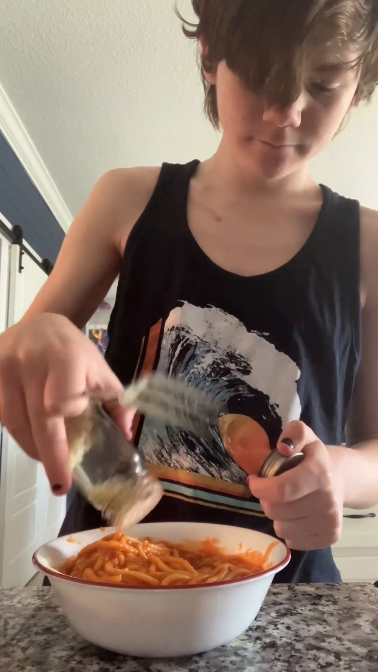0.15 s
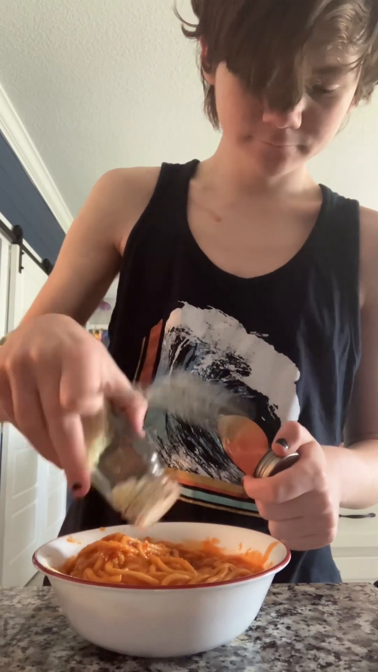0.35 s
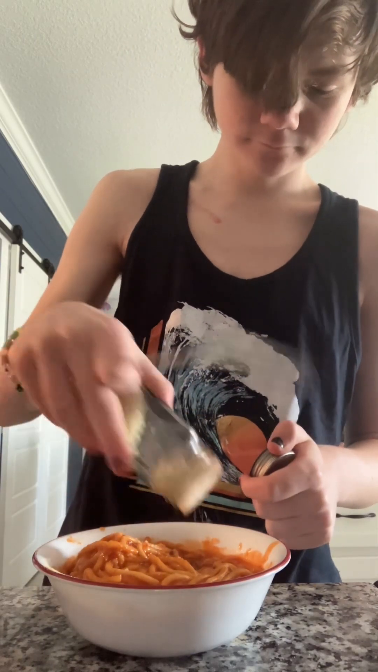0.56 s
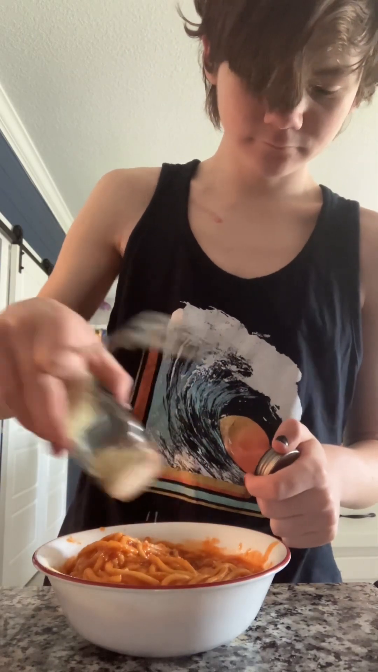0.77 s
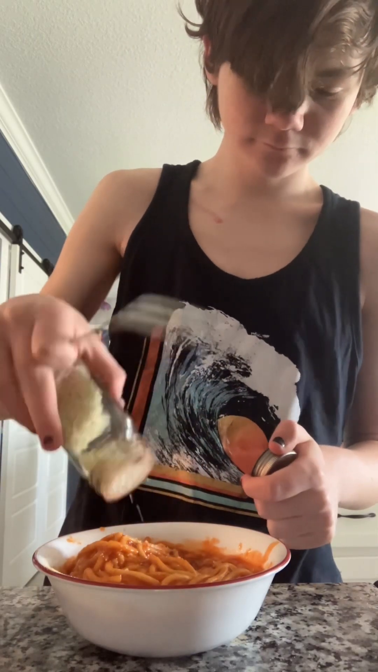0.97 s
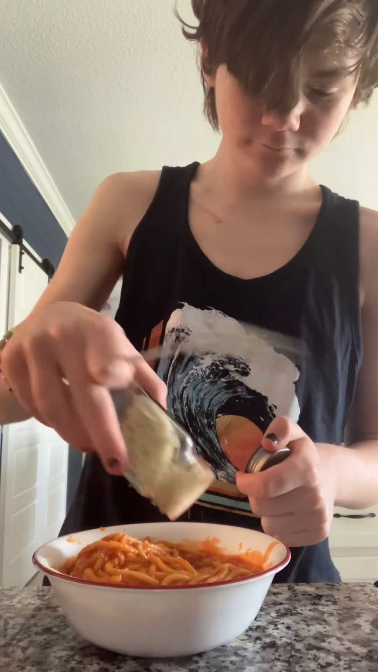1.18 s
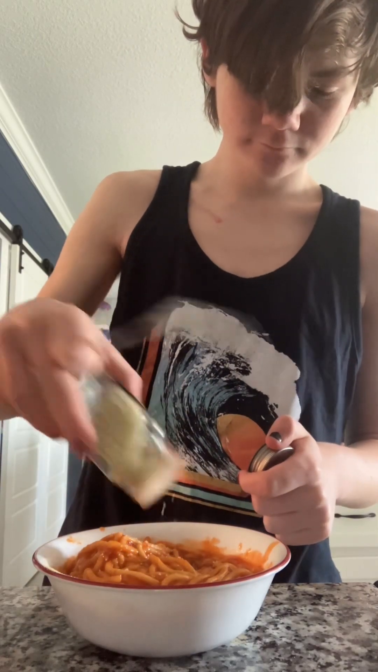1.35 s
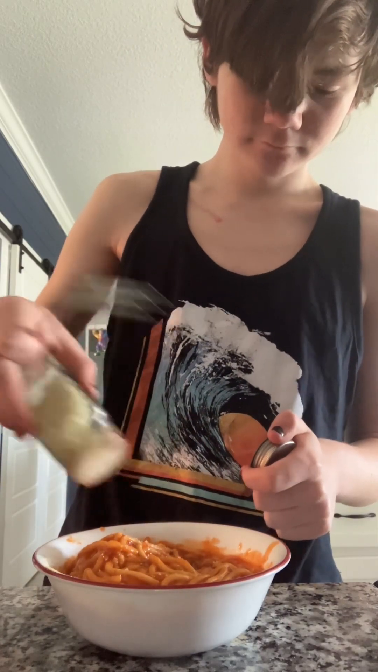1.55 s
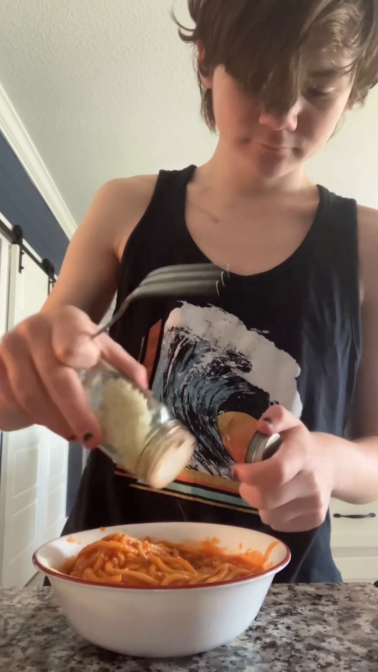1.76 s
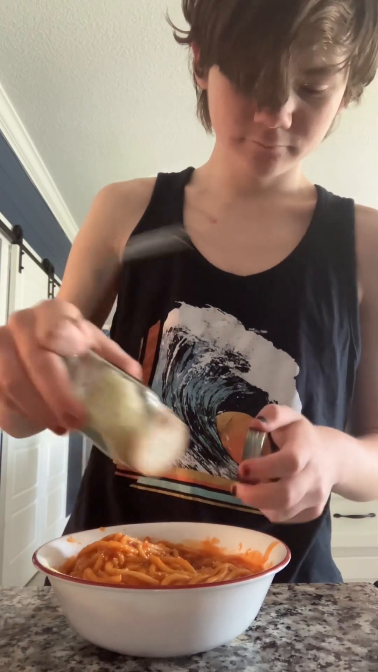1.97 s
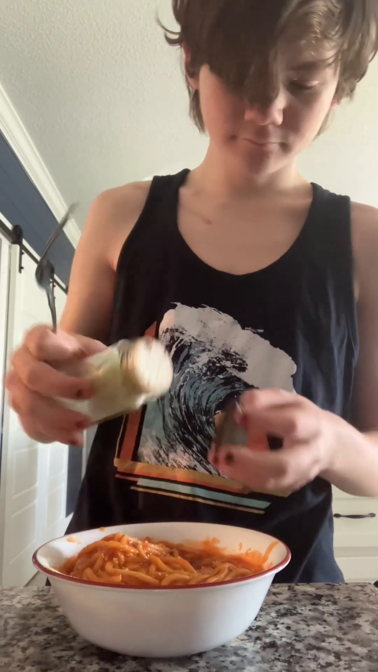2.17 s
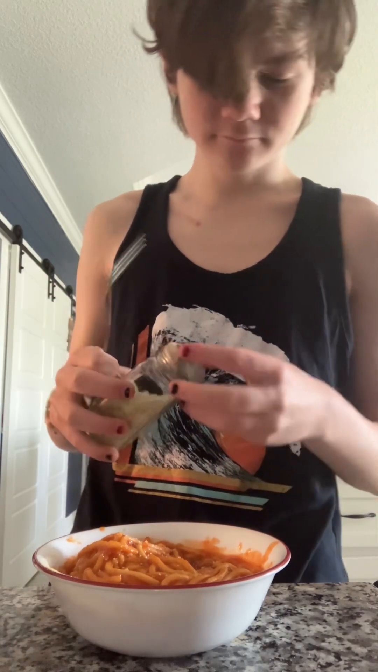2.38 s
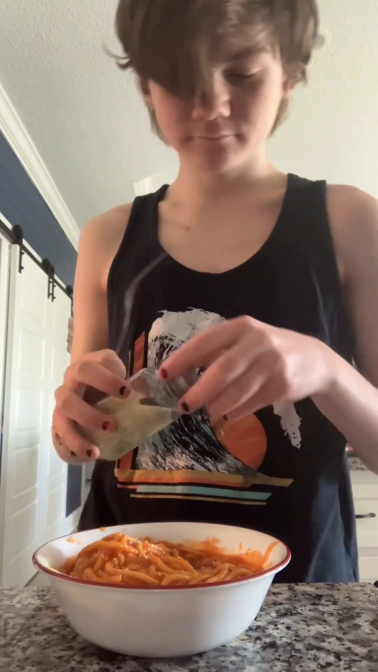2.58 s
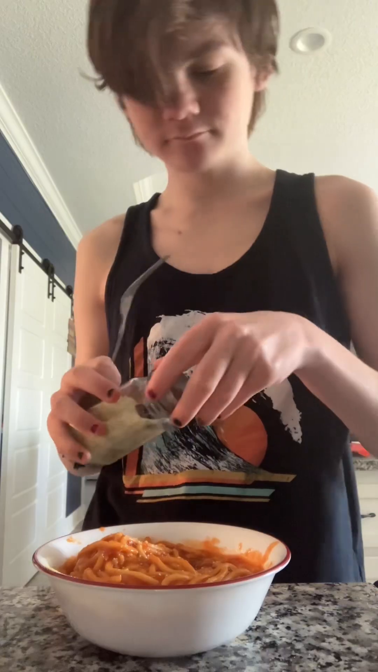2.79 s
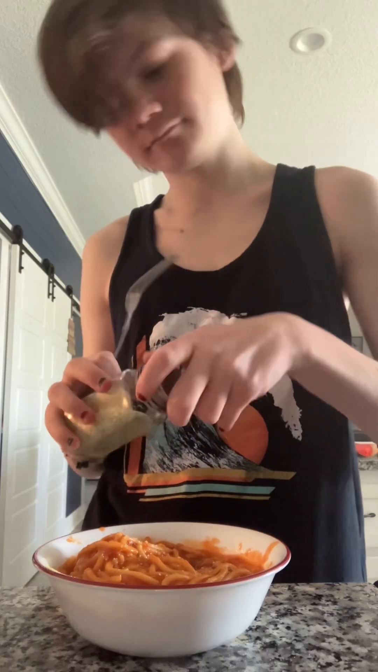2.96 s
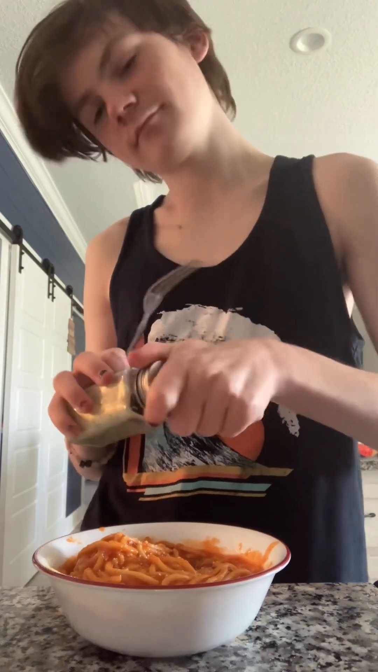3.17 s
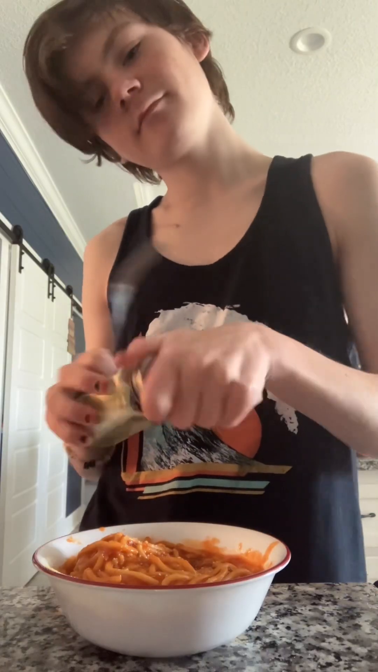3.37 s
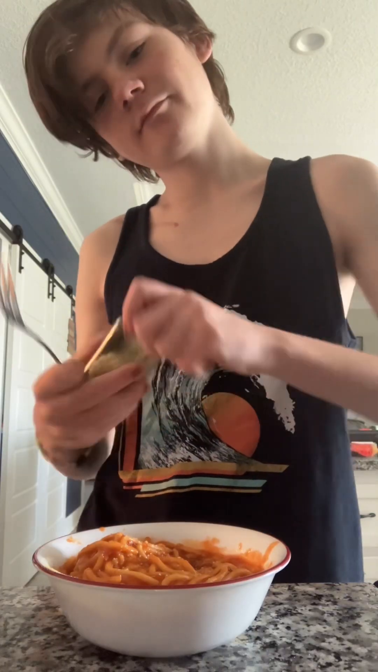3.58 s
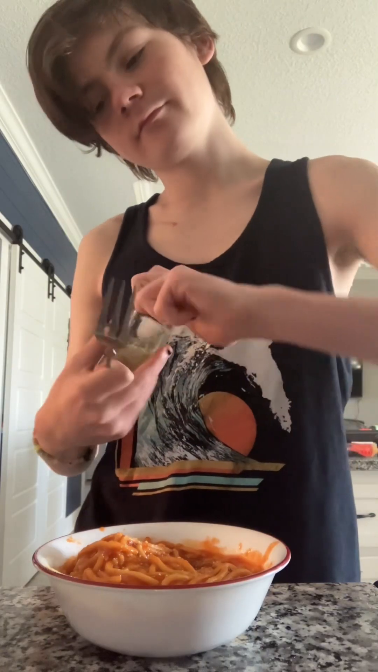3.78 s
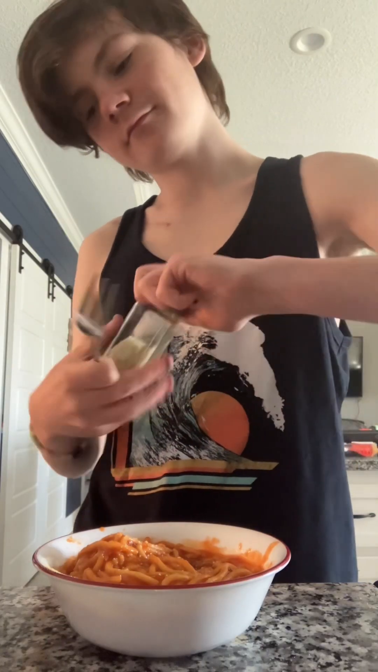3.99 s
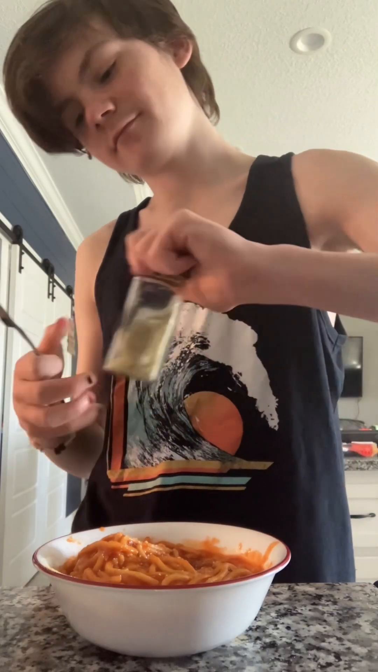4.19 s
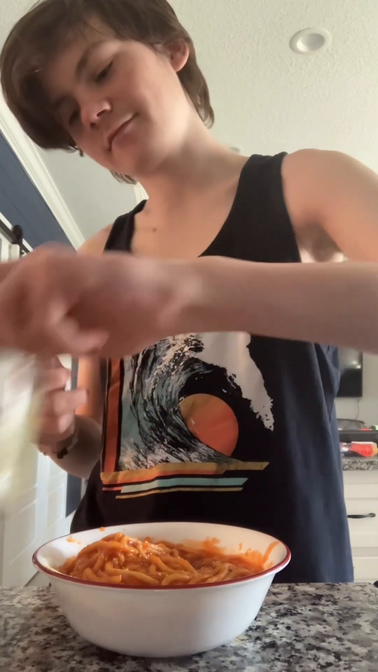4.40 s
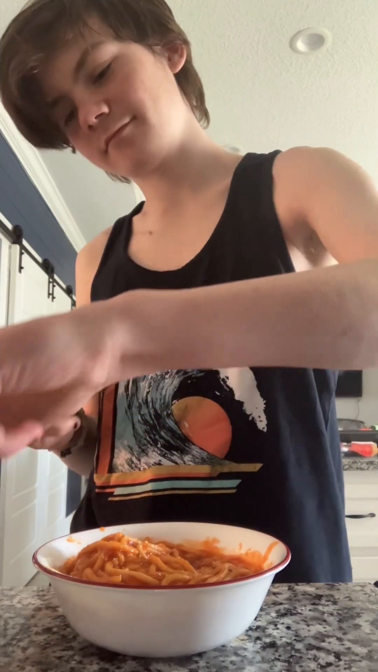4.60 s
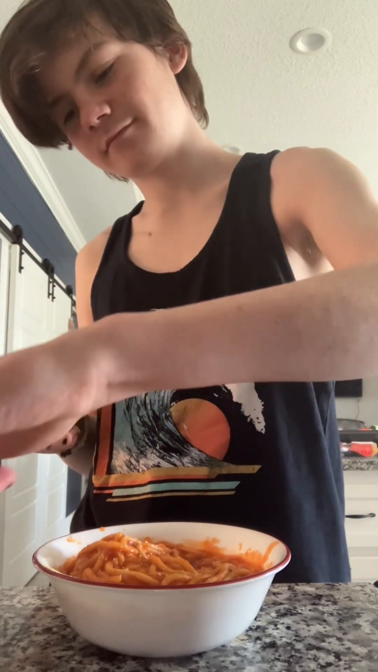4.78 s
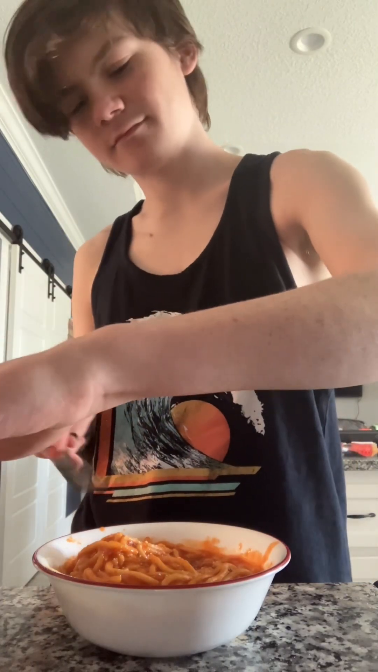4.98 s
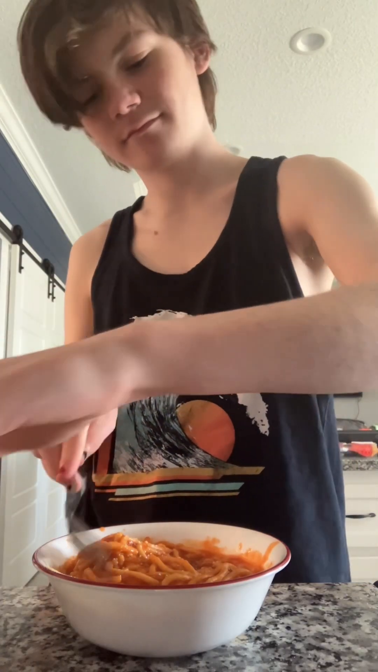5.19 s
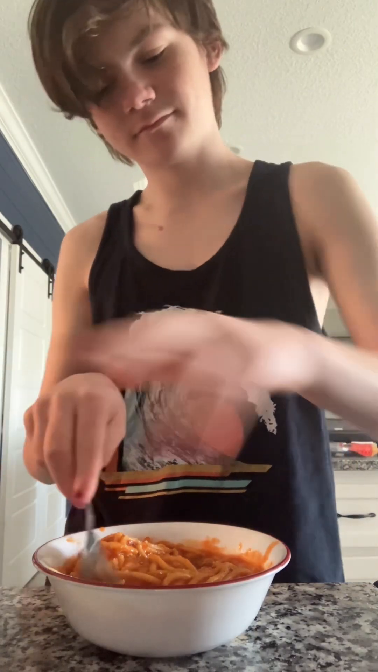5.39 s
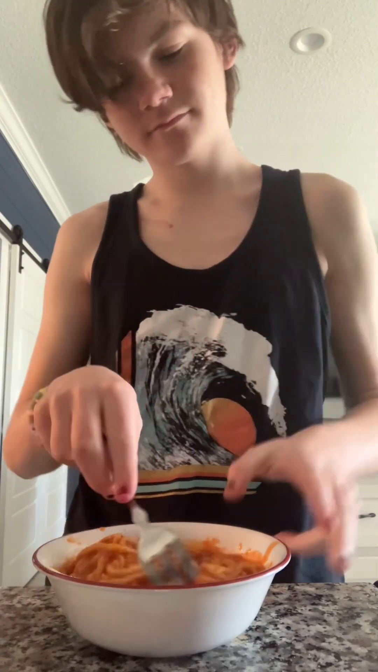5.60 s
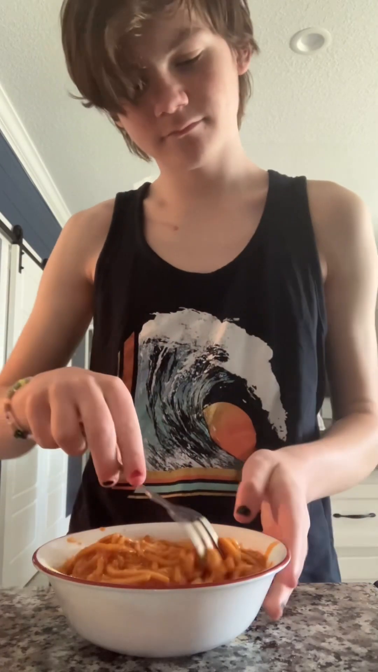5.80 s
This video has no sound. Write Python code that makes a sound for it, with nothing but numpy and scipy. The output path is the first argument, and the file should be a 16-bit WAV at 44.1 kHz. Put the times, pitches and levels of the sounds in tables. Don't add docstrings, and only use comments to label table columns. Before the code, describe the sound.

Close in a quiet kitchen, grains swish rapidly in a small glass jar for about two seconds while a fork clinks on it. A tin lid claps onto the rim, rubs, knocks and squeaks as it is screwed tight. After a pause the jar thuds onto a stone counter and rocks, then a fork lightly ticks the bowl. Faint fridge hum; stereo phone pickup.

```python
import sys
import numpy as np
from scipy import signal
from scipy.fft import rfft, irfft
from scipy.io import wavfile
from scipy.ndimage import uniform_filter1d

SR = 44100
rng = np.random.default_rng(int(sys.argv[2]) if len(sys.argv) > 2 else 0)


def pcm_store(signal):
    levels = np.round(np.clip(np.atleast_2d(signal), -1, 1) * 32767)
    wavfile.write(sys.argv[1], SR, levels.astype(np.int16).T)


def nominal_scale(level):
    x = np.asarray(level, float) / 20
    return 10 ** x


N = 257984
HZ = np.fft.rfftfreq(N, 1 / SR)

# (peak time [s], level [dB], share of the throw spent rising [0-1])
THROWS = [(0.0, -45.5, 0.32), (0.107, -49.5, 0.52), (0.186, -47.5, 0.53), (0.276, -47, 0.23),
          (0.362, -46.5, 0.37), (0.486, -49.5, 0.72), (0.556, -48.5, 0.56), (0.648, -48, 0.29),
          (0.721, -50, 0.38), (0.769, -55.5, 1), (0.844, -49.5, 0.19), (0.93, -46, 0.36),
          (1.042, -48, 0.61), (1.118, -48, 0.46), (1.249, -55.5, 0.45), (1.317, -53, 0.46),
          (1.428, -52.5, 0.26), (1.508, -50.5, 0.4), (1.627, -50, 0.5), (1.728, -47.5, 0.81),
          (1.835, -49.5, 0.83), (1.887, -48.5, 0.51)]
# (frequency [Hz], density [dB per Hz])
GRAIN_SPECTRUM = [(530, -77.5), (900, -29), (2110, -9), (2400, -18.5), (3080, -15.5), (3560, -11.5),
                  (4600, -1.5), (13900, 2.5), (15700, 2.5), (16200, -41)]
# (frequency [Hz], width [Hz], level [dB])
JAR_HISS = [(3740, 260, -9), (7894, 320, -10), (10380, 1200, -12)]


def grains():
    throw_s = 0.034
    s, db, share = np.transpose(THROWS)[:, :, None]
    rise, fall = throw_s * np.clip([share, 1 - share], .08, 1)
    grid = np.arange(0, 2.1, .001)
    late = grid - s
    decay = abs(late / np.where(late < 0, rise, fall)) ** 1.16
    power = (nominal_scale(db) ** 2 * np.exp(-decay)).sum(0)
    level = np.sqrt(np.interp(np.arange(N) / SR, grid, power, right=0))
    clumps = nominal_scale(1.1 * evened(uniform_filter1d(rng.standard_normal(N), 150)))
    impacts = colour(grit(9000, 3.5) * clumps, GRAIN_SPECTRUM, JAR_HISS)
    return nominal_scale(1.5) * level * patchy(impacts, 1.8)


# (time [s], peak # level [dB], frequency [Hz])
FLICKS = [(.0872, -46, 9000), (0.176, -47, 7800), (.183, -38.5, 7840), (0.269, -46, 8000),
          (.283, -40, 10000), (0.367, -41, 9500), (0.534, -43, 10000), (0.619, -45, 8500),
          (0.6464, -39, 10500), (1.2446, -44, 9000), (1.3104, -39, 10000), (1.4955, -41.5, 9000),
          (1.62, -44, 7450), (1.6945, -39, 10000), (1.8657, -44, 10000), (1.886, -34.5, 10000),
          (5.435, -38, 14300), (5.534, -53, 13800), (5.581, -47, 9400), (5.6889, -51, 14500),
          (5.7288, -49.5, 8440), (5.737, -55, 13300), (5.811, -56, 11400), (.0452, -37.5, 6200),
          (5.1127, -46, 1050), (4.838, -34, 1050)]


def flicks():
    out, t = np.zeros(N), np.arange(4000) / SR
    decay = nominal_scale(-60 * t / 0.016) + nominal_scale(-21.5 - 60 * t / 0.16)
    for (s, db, hz), noise in zip(FLICKS, rng.standard_normal((len(FLICKS), len(t)))):
        width = 0.23 * hz
        burst = resonate(resonate(noise * decay, hz, width), hz, width)
        add(out, s, nominal_scale(db) * burst / abs(burst).max())
    return out


# (time [s], peak level of the ring at 6-9 kHz [dB], body against the ring [dB],
# edge against the ring [dB], contact t60 [s])
FORK_ON_JAR = [
    (0.0455, -46, -3, -0.5, 0.0074),
    (0.053, -45.5, 8.5, 1, 0.026),
    (0.2339, -44, 3.5, -10, 0.0078),
    (0.4181, -37, 1.5, -1, 0.0352),
    (0.5866, -53, 8.5, 10, 0.023),
    (1.0191, -63, -2.5, 11.5, 0.0088),
    (1.5544, -27.5, -9, -12, 0.00963),
    (1.7635, -26, -9.5, -13, 0.0076),
    (1.9524, -17.5, -14, -7, 0.0071),
]
# (frequency [Hz], level [dB], t60 [s])
JAR = [(1500, -10, .02), (2300, -12, .012), (3880, 0, .015), (4450, -9, .012), (5000, -9, .012),
       (5450, -5, .022), (7220, 0, .016), (7760, -3, .02), (7650, -34, .15), (9200, -6, .01),
       (11630, -8, .012), (12560, -20, .02), (14200, -12, .015)]
# (frequency [Hz], level [dB], t60 [s])
JAR_NECK = [(1500, -15, 0.029), (2000, -15, 0.038), (3940, -9, 0.027), (4300, -9, 0.013), (5260, -26, .012),
            (5900, -15, .014), (7170, -5, 0.023), (7130, -15, .012), (6767, -24, .02), (9200, -30, .01),
            (10650, -20, .012), (12550, -20, .03), (14100, -24, .015)]


def fork_on_jar():
    taps = light(FORK_ON_JAR, -24.0)
    out = hits(taps[:6], JAR, -12, 830)
    out += hits(taps[6:7], JAR_NECK, -18, 780)
    return out + hits(taps[7:], JAR, -15.5, 876)


# (time [s], edge level [dB], ring against the edge [dB])
TICKS = [(0.8407, -37.5, -23), (0.906, -37.5, -5), (0.9298, -46, 7), (0.978, -39, -6.5),
         (1.0432, -44, -22.5), (2.0373, -51, -4.5), (2.053, -54, -4), (3.8402, -57.5, -8),
         (3.8986, -57.5, -5.5), (4.016, -62.5, -2), (4.5808, -52.5, -4), (4.613, -51.5, -17),
         (4.7426, -58, -11), (4.759, -46.5, -10.5), (5.534, -70, -14), (5.5806, -53, -9), (5.6889, -63, -8),
         (5.729, -62.5, -2), (5.737, -65, -13), (5.812, -67, -11)]
# (time [s], ring level [dB], body against ring [dB], edge against ring [dB],
# contact t60 [s])
SNICKS = [
    (1.9449, -35.5, -5.5, -0.46, 0.012),
    (2.5045, -24, -10.5, -2, 0.011),
]
KNOCKS = [
    (2.5605, -25.5, -13.5, -3.5, 0.009),
    (2.7925, -52.5, -12.5, -2.5, 0.015),
    (3.04, -45.5, -4, -0.6, 0.059),
    (3.077, -47, -10, -12, 0.011),
    (3.1512, -41, 7.5, -6.5, 0.0196),
    (3.1553, -28, -5.5, 1.5, 0.018),
    (3.4465, -44.5, -3, 10.5, 0.038),
]
# (frequency [Hz], level [dB], t60 [s])
DULL = [(4384, -4, 0.031), (7970, -2, 0.0058), (10130, 8.5, .006), (14270, -2.5, 0.0017)]


def damped_knocks():
    ticks = [(s, edge + ring, edge - 40, edge - 31, edge, 0.019) for s, edge, ring in TICKS]
    return hits(ticks + light(SNICKS, -30.0) + light(KNOCKS, -4.0), DULL, 4.2, 790)


# (start [s], length [s], level [dB], change over the stroke [dB])
RUBS = [(1.98, 0.34, -58.5, -32), (2.4, 0.125, -54, 3.5), (2.52, 0.042, -48, -1.5), (2.585, 0.21, -57, -30),
        (3.085, 0.0924, -55, 5.5), (3.185, 0.034, -49, -9), (3.225, 0.038, -49.5, -7),
        (3.26, 0.13, -60, -3.5), (3.41, 0.038, -60.5, 4.5), (3.455, 0.099, -45, -9.5),
        (3.545, 0.06, -48, -0.5), (3.64, 0.085, -53.5, 1), (3.73, 0.12, -58.5, -8), (3.8, 0.082, -65, -3.5),
        (3.9, 0.0175, -68, -3.5), (4.025, 0.02994, -76.5, 3), (5.46, 0.096, -66, -12),
        (5.578, 0.082, -73, -21), (5.68, .16, -87, 6)]
# (frequency [Hz], density [dB per Hz])
RUB_HIGH = [(2060, -43.5), (3500, -14), (5200, -1), (8620, -1), (11000, -4), (14100, 0), (15700, -8),
            (16200, -39)]
RUB_LOW = [(290, -33.5), (500, 0), (1290, -20.5), (1600, -3), (1960, -9), (2140, -5), (2730, -3.5),
           (5000, -9), (6500, -28.5), (11000, -120)]
# (frequency [Hz], width [Hz], level [dB])
RUB_RING = [(4170, 290, -0.5), (7310, 620, -4), (10600, 2500, -5.5)]
# (start [s], length [s], level [dB], change [dB])
LID_SLIDE = [
    (2.245, .06, -69, 13),
    (2.312, .04, -52.5, 5),
]
# (frequency [Hz], width [Hz], level [dB])
LID_RING = [(4411, 300, 12.5), (6860, 150, 3), (7900, 250, 9), (10600, 300, 8.5), (13200, 400, -5)]
# (start [s], length [s], level [dB], change [dB])
SLIDES = [
    (2.212, 0.033, -56, -11.5),
    (4.42, 0.073, -75.5, 21),
    (4.494, 0.17, -53, -21.5),
    (4.755, 0.047, -61.5, -13),
    (5.035, 0.06, -81.5, 17),
    (5.165, 0.021, -66.5, -13),
]
# (frequency [Hz], density [dB per Hz])
SLIDE = [(2500, -40), (3800, -16), (6000, -14), (7000, -6), (9200, -6), (12000, -4), (16000, -8)]
# (frequency [Hz], width [Hz], level [dB])
SLIDE_RING = [(4600, 250, 7), (7680, 380, 13.5), (10900, 900, 3.5), (13900, 900, 0.5)]


def rubs():
    clumps = nominal_scale(2.0 * evened(uniform_filter1d(rng.standard_normal(N), 200)))
    slip = grit(11000, 3.3) * clumps
    bright = stroke(RUBS) * patchy(colour(slip, RUB_HIGH, RUB_RING), 4.1)
    dull = stroke(RUBS, offset_db=-4.5, growth=1.8) * evened(colour(slip, RUB_LOW))
    skim = stroke(LID_SLIDE) * patchy(colour(slip, SLIDE, LID_RING), 3.0)
    singing = stroke(SLIDES) * patchy(colour(slip, SLIDE, SLIDE_RING), 2.6)
    return bright + dull + skim + singing


# (start [s], length [s], from [Hz], to [Hz],
# level [dB])
CREAKS = [(0.004, 0.0131, 2080, 1760, -59.5), (2.419, 0.087, 453, 520, -56), (2.424, 0.12, 600, 623, -60.5),
          (2.48, 0.053, 510, 387, -45), (2.528, 0.0269, 503, 437.4, -46.5),
          (3.445, 0.033, 3060, 3000, -56.5), (3.481, 0.09, 3400, 3650, -59),
          (3.555, 0.067, 3770, 4030, -50.5), (3.56, 0.041, 2200, 2150, -62),
          (3.565, 0.037, 3425, 3500, -52), (4.016, 0.043, 3810, 3680, -69.5),
          (4.426, .09, 4660, 4600, -72.5), (5.803, 0.022, 4600, 4740, -64), (5.806, 0.014, 4000, 4000, -70)]


def creaks():
    out = np.zeros(N)
    for s, length, from_hz, to_hz, db in CREAKS:
        hz = np.linspace(from_hz, to_hz, round(length * SR))
        slips = rng.standard_normal(len(hz)) * (rng.random(len(hz)) < .05)
        width = 50 + 0.055 * from_hz
        tone = evened(resonate(resonate(slips, hz, width), hz, width))
        add(out, s, nominal_scale(db) * tone * signal.windows.tukey(len(hz), .6))
    return out


# (time [s], ring level [dB], body against ring [dB], edge against ring [dB],
# contact t60 [s])
RIM_TOUCHES = [
    (2.2085, -45, 0.62, -8, 0.012),
    (2.218, -49, 1, -8, 0.0096),
    (2.2235, -53.5, 0.25, -8, 0.0056),
    (2.238, -58, 0, -8.5, 0.0071),
    (3.1676, -26, -1.7, -4, 0.013),
]
# (frequency [Hz], level [dB], t60 [s])
RIM = [(2320, -12, 0.02), (4470, -0.5, 0.017), (4530, -3, 0.014), (5800, -7.5, .035), (7270, -4, 0.024),
       (7560, -1.5, 0.021), (9100, -3.5, .03), (10728, -11, .02), (12500, -12, .015), (14190, -8, .012)]


def rim_touches():
    return hits(light(RIM_TOUCHES, -23), RIM, -8, 1100)


# (time [s], ring level [dB], body against ring [dB], edge against ring [dB],
# contact t60 [s])
LID_CLAP = [
    (2.366, -12, 1, -3.5, 0.014),
]
# (frequency [Hz], level [dB], t60 [s])
LID = [(2250, -26, .008), (2995, -3, .035), (3110, -3, .025), (3770, -6, .02), (4205, 2, .02),
       (5610, -12, .02), (5970, -10, .022), (6220, -3, .01), (6950, -10, .01), (8015, -6, .014),
       (9000, -8, .008), (12200, -6, .006), (15600, -8, .006)]


def lid_clap():
    return hits(light(LID_CLAP, -27.5), LID, -14, 1200)


# (time [s], ring level [dB], body against ring [dB], edge against ring [dB],
# contact t60 [s])
LID_TURNS = [
    (3.6158, -34.5, 7.5, 13.5, 0.022),
    (3.6219, -22.5, -2.5, -13.5, 0.034),
    (3.7021, -28, -6, -2.3, 0.023),
]
# (frequency [Hz], level [dB], t60 [s])
THREAD = [(1740, -19, 0.024), (2370, -9.5, 0.035), (4710, -0.5, 0.015), (5470, 5, 0.021),
          (7646, -0.5, 0.0079), (9170, -11, 0.014), (10790, -11, 0.027), (14100, -2, 0.013)]
# (frequency [Hz], level [dB], t60 [s])
THREAD_END = [(2330, -6, 0.035), (2820, -12, 0.036), (3960, -3.5, 0.067), (4880, 2.5, .03),
              (7200, 0, 0.018), (7620, -2.5, .015), (11440, -6, 0.022), (13900, -2, 0.018)]


def lid_turns():
    turns = light(LID_TURNS, -24.5)
    return hits(turns[:2], THREAD, -4.5, 540) + hits(turns[2:], THREAD_END, -7, 590)


# (time [s], peak level [dB], frequency [Hz], t60 [s])
TIN = [(.419, -44, 5464, .09), (1.019, -50.5, 1724, .0037), (1.764, -57.5, 1500, .05),
       (1.952, -40, 11630, .06), (1.953, -41, 9200, .03), (2.366, -50, 450, .025), (2.366, -51, 1050, .012),
       (2.369, -47, 3097, .4), (3.169, -29.5, 9170, .025), (3.169, -52, 14190, .1),
       (3.172, -43.5, 7580, .118), (3.617, -44, 14190, .17), (3.619, -44, 12550, .24),
       (3.62, -50, 7224, .18), (5.1135, -38, 10300, .0086)]


def free_rim():
    return rings(TIN, 0.91)


# (time [s], peak level [dB], frequency [Hz], t60 [s])
NECK = [
    (2.5042, -47, 1720, 0.02),
    (2.5306, -40.5, 1792, 0.0244),
    (2.5617, -30, 1740, 0.0177),
    (2.5795, -70.5, 1800, 0.0188),
    (2.7904, -61.5, 1680, 0.024),
    (2.8383, -65, 1740, 0.024),
    (3.044, -55.5, 1704, 0.0353),
    (3.0787, -55, 1620, 0.065),
]


def neck_air():
    return rings(NECK, 7.7)


# (time [s], ring level [dB], body against ring [dB], edge against ring [dB],
# contact t60 [s])
FORK_IN_BOWL = [
    (5.4331, -36, -12.5, 5.2, 0.009),
]
# (frequency [Hz], level [dB], t60 [s])
BOWL = [(1143, 8.5, 0.037), (2218, -7, 0.032), (3350, -23, 0.0186), (4820, -13.5, 0.022),
        (5750, 3.5, 0.022), (5800, -9, 0.046), (7180, -5, 0.0205), (7800, 3, 0.015), (10497, -4, 0.025),
        (10970, -6, 0.034), (13500, 1, .008)]


def fork_in_bowl():
    return hits(light(FORK_IN_BOWL, 3.5), BOWL, -17.0, 1190)


# (time [s], thud level [dB], body against thud [dB], ring against thud [dB],
# contact t60 [s])
SET_DOWN = [
    (4.8305, -48, -4, -39.5, 0.055),
    (4.8374, -21.5, -1, -5, 0.019),
    (4.8465, -24.5, -13, -12.5, 0.03),
    (5.0822, -31, -28.5, -22, 0.0497),
    (5.1122, -27, -5, -20, 0.041),
]
# (frequency [Hz], level [dB], t60 [s])
COUNTER = [(578, -10, 0.12), (973, -12, 0.043), (1070, -8, 0.022), (1295, -4.5, 0.04), (1506, -1.5, 0.029),
           (1640, -6, 0.047), (1826, -1.5, 0.036), (2200, 0, 0.038), (2450, 3, .02), (3000, 2, 0.032),
           (3500, 7.5, .015), (3830, 11, 0.0153), (6810, 0, 0.012), (6960, 12, 0.016)]
# (frequency [Hz], level [dB], t60 [s])
ROCKING = [(406, -4, 0.052), (520, -3.5, 0.085), (914, -4, 0.085), (1160, -7.5, 0.057), (1284, -6.5, 0.052),
           (1880, -2.5, 0.019), (2150, -1, 0.03), (2316, -2.5, 0.046), (2770, 2, 0.025), (2980, 6.5, 0.023),
           (3350, 4, 0.016), (3650, 8.5, 0.017), (4200, -24, 0.03003), (7100, 10, 0.015)]


def set_down():
    landings = heavy(SET_DOWN, -11)
    return hits(landings[:3], COUNTER, -12.0, 267) + hits(landings[3:], ROCKING, -8.5, 330)


# (start [s], length [s], level [dB], change [dB])
SHUDDERS = [
    (4.822, 0.013, -58.5, 16),
    (4.85, 0.017, -41, -10.5),
    (5.072, 0.0068, -58, 10),
    (5.092, 0.019, -51, 4),
    (5.122, 0.018, -46, -11.5),
    (4.87, 0.22, -57.5, -17.5),
    (5.14, 0.11, -60, -26),
]
# (frequency [Hz], density [dB per Hz])
SHUDDER = [(250, -13), (500, 5), (1200, 0), (2600, -7), (3800, -16), (4800, -38), (9000, -45)]


def shudder():
    return stroke(SHUDDERS) * patchy(colour(grit(5000, 4.2), SHUDDER), 2.5)


# (time [s], peak level [dB], frequency [Hz], t60 [s])
THUMPS = [(2.562, -37.5, 212, 0.0249), (2.575, -52, 110.8, 0.164), (3.152, -35, 295, 0.0497),
          (3.153, -33, 612, 0.0162), (3.160, -46, 170, 0.085), (3.447, -47, 163.9, 0.033),
          (4.8385, -45, 3830, 0.0206), (4.840, -35.5, 214.5, 0.173), (4.845, -44.5, 77.1, 0.2),
          (4.850, -43, 120.3, 0.157), (5.087, -49, 316, 0.195), (5.1125, -33, 3380, 0.0156),
          (5.118, -42, 216, 0.074)]


def thumps():
    return rings(THUMPS, 0.29)


# (frequency [Hz], level [dB])
NEAR_SIDE = [(60, -8), (200, -7), (380, -3.5), (1290, -1), (2380, -1.5), (4400, -4), (8120, -21),
             (15000, -19.5)]
# (frequency [Hz], level [dB])
BASS_LEAN = [(100, -9.5), (250, -12), (500, -40.5)]


def front_side(front):
    quadrature = signal.hilbert(colour(front, NEAR_SIDE)).imag
    return -quadrature - colour(front, BASS_LEAN)


# (frequency [Hz], level [dB])
FAR_SIDE = [(60, -6), (380, -5), (700, 3.5), (1290, 6.5), (2380, 3.5), (4400, 4.5), (8120, -23),
            (15000, -16.5)]


def far_side(x):
    return colour(x, FAR_SIDE)


# (frequency [Hz], t60 [s])
KITCHEN = [(100, 0.94), (700, 0.24), (2100, 0.58), (2900, 0.32), (4000, 0.3), (7000, 0.28), (9500, .35),
           (16000, 0.77)]


def kitchen(x):
    taps = np.zeros((2, SR // 2))
    slots = np.arange(200, SR // 2 - 20, 20)
    at = slots + rng.integers(0, 20, (2, len(slots)))
    np.put_along_axis(taps, at, rng.choice([-1., 1.], at.shape), 1)
    hz, t, z = signal.stft(taps, SR, nperseg=256)
    tail = signal.istft(z * nominal_scale(-60 * t / read(KITCHEN, hz)[:, None]), SR, nperseg=256)[1]
    mid, side = signal.fftconvolve(x[None], tail / np.linalg.norm(tail[0]), axes=1)[:, :N]
    return np.array([mid, far_side(side)])


# (frequency [Hz], density [dB per Hz])
AIR = [(42, -19.5), (72, -7.5), (113, -9.5), (174, -14), (262, -22), (412, -21), (640, -28.5), (871, -51),
       (1430, -38.5), (2960, -45.5), (4660, -49), (14500, -45.5), (16200, -63)]


def air():
    a, b = rng.standard_normal((2, N))
    wash = nominal_scale(-62.5) * colour(np.array([a, b]), AIR) / np.std(colour(a, AIR))
    waver = evened(resonate(rng.standard_normal(N), .01, 3.0))
    turn = 2 * np.pi * np.cumsum(59 + 0.47 * waver) / SR
    hum, late_hum = nominal_scale(-57.5) * np.sin([turn, turn + 1.9])
    lean = np.clip(read([(60, 0.86), (300, 0.48), (700, .0)], HZ), 0, 1)
    side = irfft(rfft(wash[1]) * np.sqrt(1 - lean ** 2) - rfft(wash[0]) * lean, N) + 0.92 * late_hum
    return np.array([wash[0] + hum, far_side(side)])


def hits(events, body, crack_db, low_hz):
    out, t = np.zeros(N), np.arange(9000) / SR
    hz, db, t60 = np.transpose(body)[:, :, None]
    edges = [(low_hz, 2500), (2500, 6000), (6000, 9000), (9000, 16500)]
    bands = [signal.butter(3, e, "band", fs=SR, output="sos") for e in edges]
    for s, high_db, low_db, mid_db, top_db, contact in events:
        grip = rng.standard_normal((len(body), 2))
        decay = nominal_scale(db + 1.5 * grip[:, :1] - 60 * t / t60)
        ring = decay * np.sin(2 * np.pi * hz * (1 + .005 * grip[:, 1:]) * t)
        u = t / max(contact, .001)
        bumps = nominal_scale(4.0 * rng.standard_normal(len(t) // 30 + 1)).repeat(30)[:len(t)]
        chatter = rng.standard_normal(len(t)) * bumps
        touch = chatter * nominal_scale(-60 * u) * np.minimum(u / 0.081, 1)
        knock = np.arange(len(t)) == round(.05 * contact * SR)
        blow = 0.4 * touch / np.linalg.norm(touch) + knock
        sound = evened(signal.fftconvolve(blow, ring.sum(0))[:len(t)])
        sound = sound + nominal_scale(crack_db) * evened(touch)
        levels = (low_db, mid_db, high_db, top_db)
        for band, band_db, sign in zip(bands, levels, (1, -1, 1, -1)):
            part = signal.sosfilt(band, signal.sosfilt(band, sound))
            add(out, s - .0006, sign * nominal_scale(band_db + 3.5) * part / abs(part).max())
    return out


def light(rows, thud_db):
    return [(s, db, db + body + thud_db, db + body, db + edge, contact)
            for s, db, body, edge, contact in rows]


def heavy(rows, edge_db):
    return [(s, db + ring, db, db + body, db + ring + edge_db, contact)
            for s, db, body, ring, contact in rows]


def rings(events, rise_turns):
    out, t = np.zeros(N), np.arange(12000) / SR
    for s, db, hz, t60 in events:
        shape = nominal_scale(-60 * t / t60) * (1 - np.exp(-t * hz / rise_turns))
        add(out, s, nominal_scale(db) * shape / shape.max() * np.sin(2 * np.pi * hz * t))
    return out


def stroke(rows, offset_db=0, growth=1):
    t, gain = np.arange(N) / SR, np.zeros(N)
    for s, length, db, change_db in rows:
        level_db = db + change_db * np.clip((t - s) / length, 0, 1)
        fade_in = np.clip((t - s + .01) / .01, 0, 1)
        fade_out = np.clip((s + length + .02 - t) / .02, 0, 1)
        gain = np.maximum(gain, fade_in * fade_out * nominal_scale(offset_db - 50 + growth * (level_db + 50)))
    return gain


def grit(per_s, spread_db):
    size = nominal_scale(spread_db * np.minimum(rng.exponential(1, N), 4)) * rng.choice([-1., 1.], N)
    return evened(size * (rng.random(N) < per_s / SR))


def patchy(x, patchy_db):
    z = signal.stft(x, nperseg=256)[2]
    patches = rng.standard_normal(z.shape[::-1]).T
    patches = evened(uniform_filter1d(uniform_filter1d(patches, size=7, axis=0), size=9, axis=1))
    return evened(signal.istft(z * nominal_scale(patchy_db * patches), nperseg=256)[1][:N])


def colour(x, points, peaks=()):
    lift = 1
    for hz, width, db in peaks:
        lift = lift + nominal_scale(db + 10) / (1 + (2 * (HZ - hz) / width) ** 2)
    return irfft(rfft(x, N) * nominal_scale(read(points, HZ)) * lift, N)


def resonate(x, hz, width):
    turn = np.exp(2j * np.pi * np.cumsum(hz * np.ones(len(x))) / SR)
    r = np.exp(-np.pi * width / SR)
    return 2 * (turn * signal.lfilter([1 - r], [1, -r], x / turn + 1e-18)).real


def read(points, hz):
    f, value = np.transpose(points)
    return np.interp(np.log(hz + 1), np.log(f + 1), value)


def evened(x):
    return x / np.sqrt(np.mean(x ** 2) + 1e-20)


def add(mix, s, sound):
    part = mix[round(s * SR):][:len(sound)]
    part += sound[:len(part)]


def scene():
    near = grains() + fork_on_jar() + damped_knocks() + rubs() + creaks()
    near += rim_touches() + lid_clap() + lid_turns() + free_rim() + neck_air() + fork_in_bowl()
    counter = set_down() + shudder() + thumps()
    front = near + counter
    direct = np.array([front, front_side(front)])
    echo = kitchen(nominal_scale(-21) * near + nominal_scale(-13.5) * counter)
    mid, side = direct + echo + air() + flicks() * np.array([[1], [.08]])
    return np.array([mid + side, mid - side])


def smear(x, t60, db):
    t = np.arange(1000) / SR
    band = signal.butter(2, (700, 7000), "band", fs=SR)
    ahead = signal.lfilter(*band, rng.standard_normal(len(t))) * nominal_scale(-60 * t / t60)
    ahead = nominal_scale(db) * ahead / np.linalg.norm(ahead)
    return x + signal.oaconvolve(x[:, ::-1], ahead[None], axes=1)[:, :N][:, ::-1]


def low_pass(x):
    return signal.sosfilt(signal.butter(12, 16830, fs=SR, output="sos"), x)


def record(dry):
    edge = signal.firwin(255, 16600, window=("kaiser", 5), fs=SR)
    smeared = smear(dry, t60=.024, db=-20)
    return low_pass(signal.oaconvolve(smeared, edge[None], "same"))


dry = scene()
out = record(dry)
pcm_store(out)
```